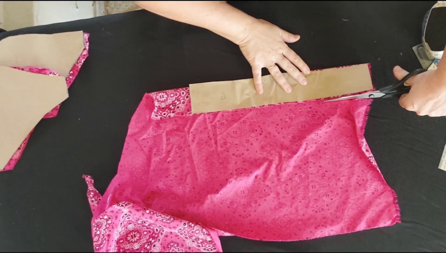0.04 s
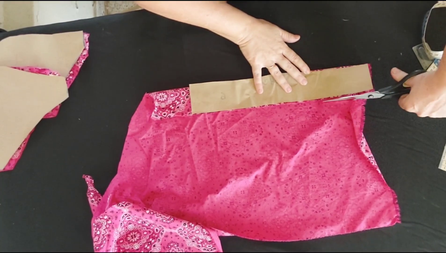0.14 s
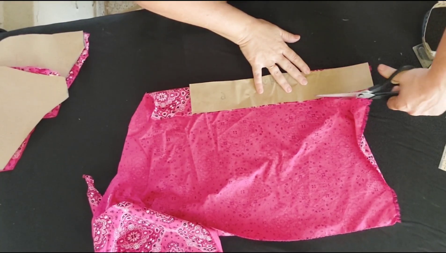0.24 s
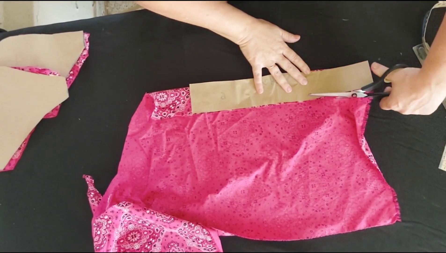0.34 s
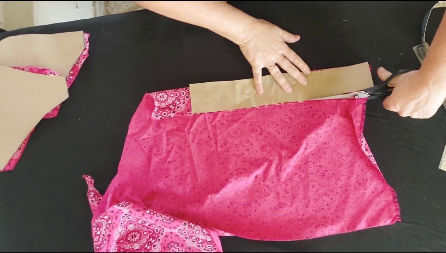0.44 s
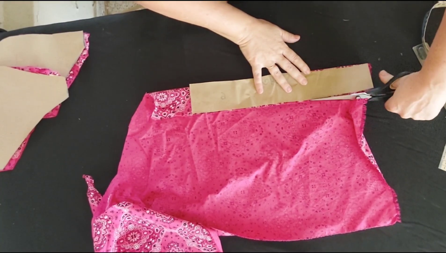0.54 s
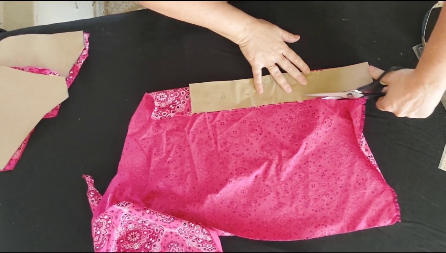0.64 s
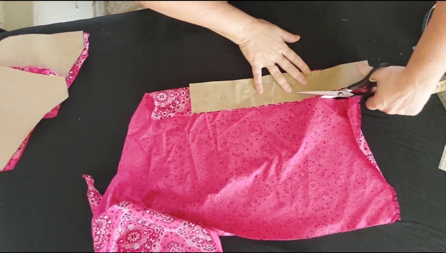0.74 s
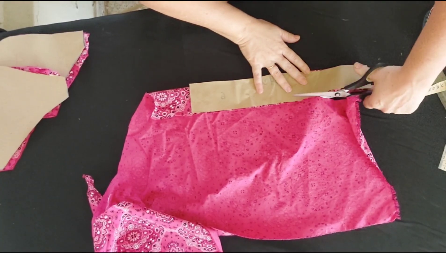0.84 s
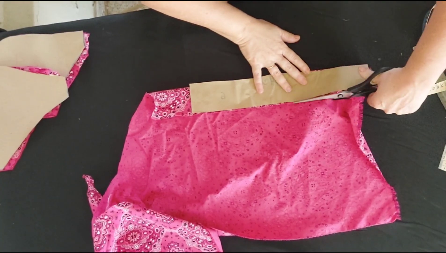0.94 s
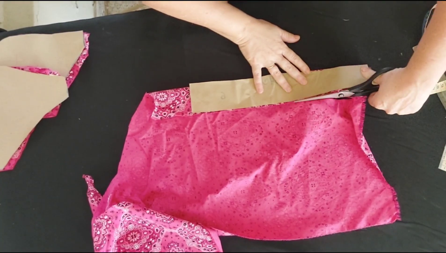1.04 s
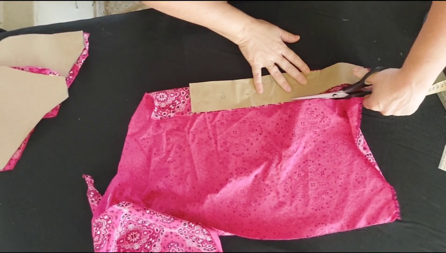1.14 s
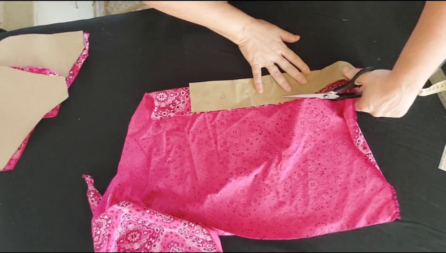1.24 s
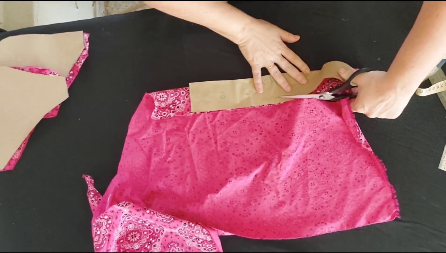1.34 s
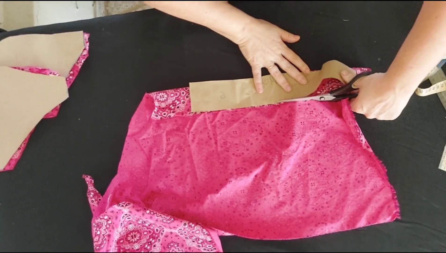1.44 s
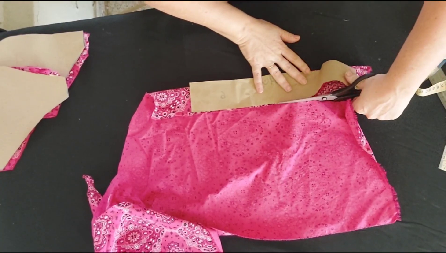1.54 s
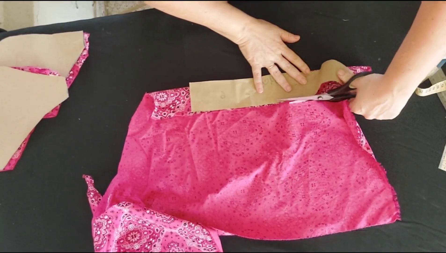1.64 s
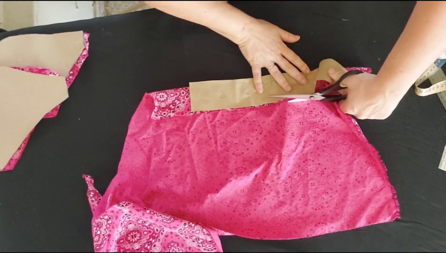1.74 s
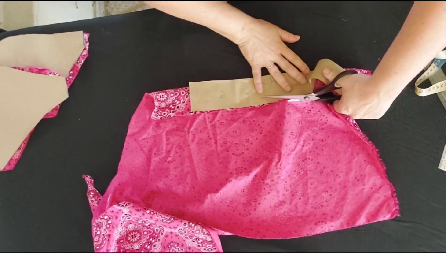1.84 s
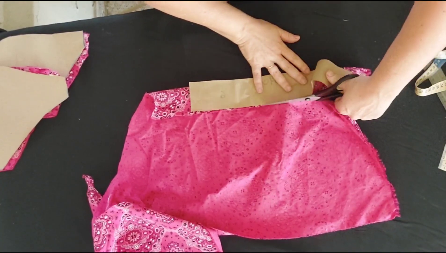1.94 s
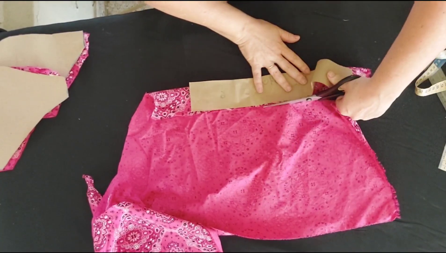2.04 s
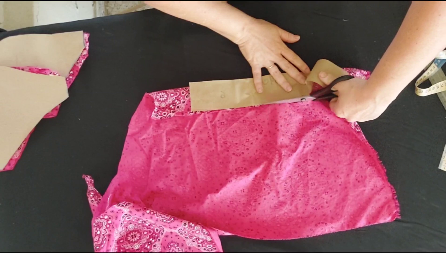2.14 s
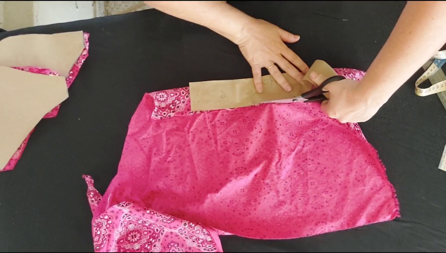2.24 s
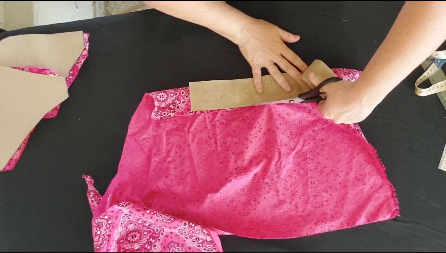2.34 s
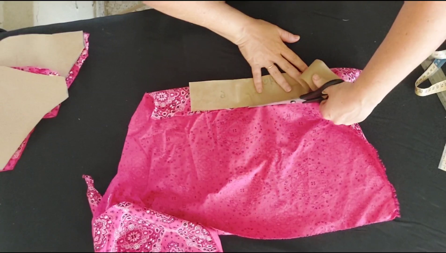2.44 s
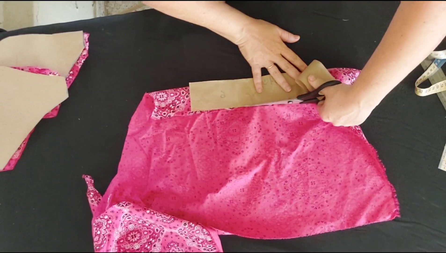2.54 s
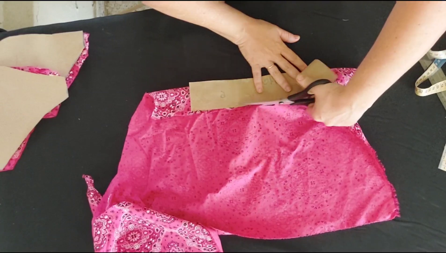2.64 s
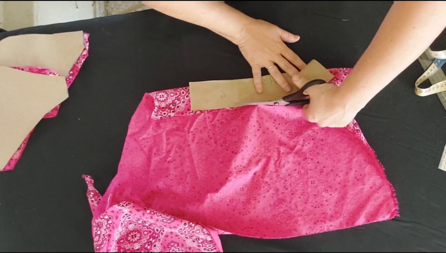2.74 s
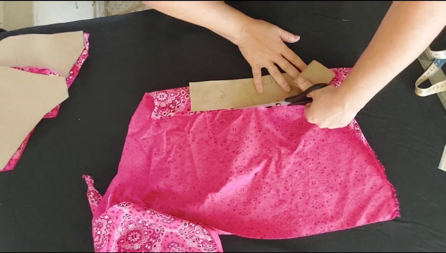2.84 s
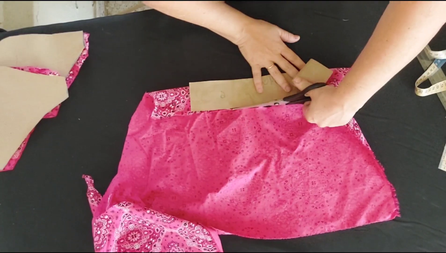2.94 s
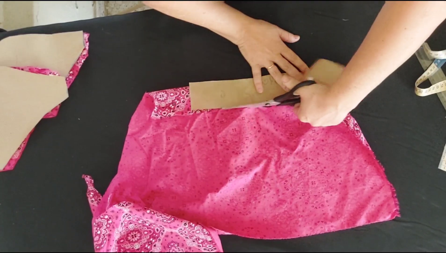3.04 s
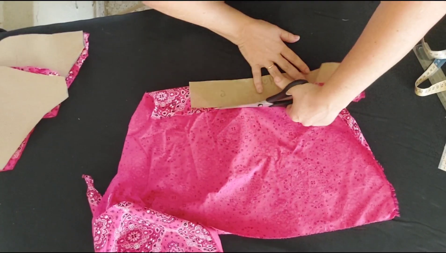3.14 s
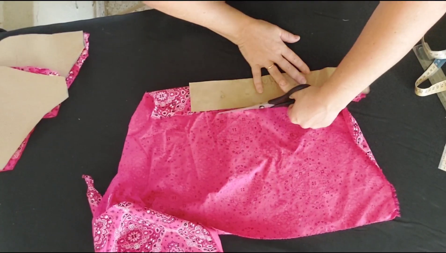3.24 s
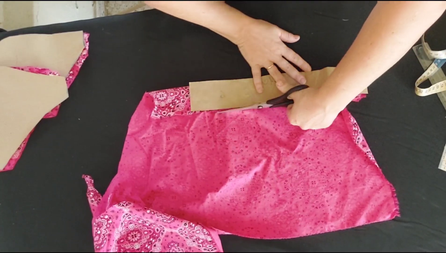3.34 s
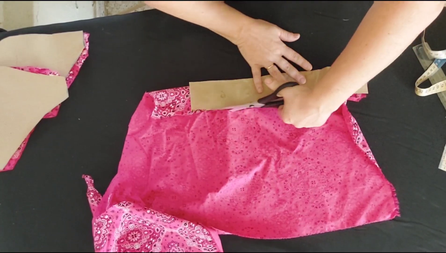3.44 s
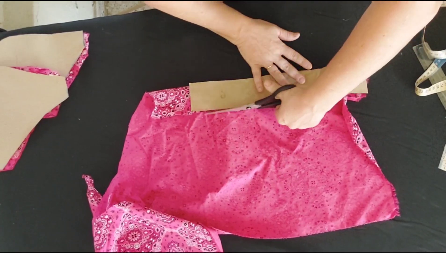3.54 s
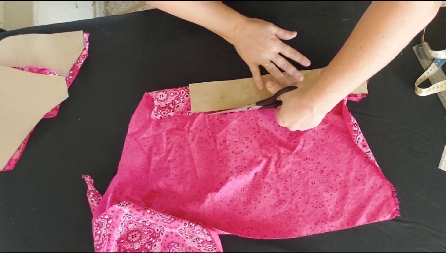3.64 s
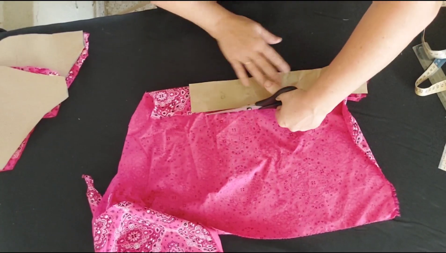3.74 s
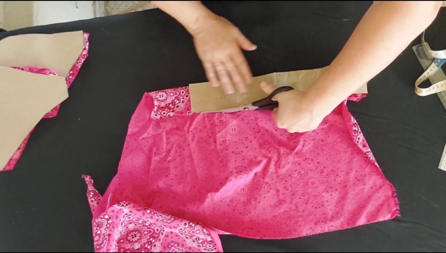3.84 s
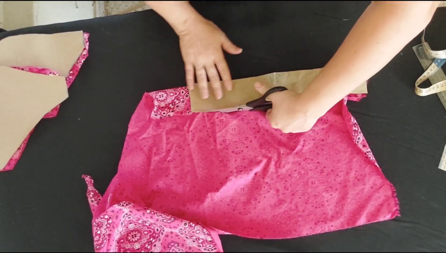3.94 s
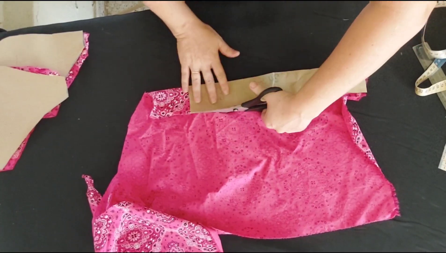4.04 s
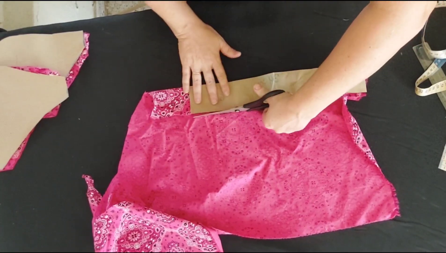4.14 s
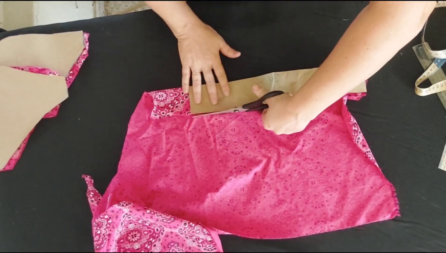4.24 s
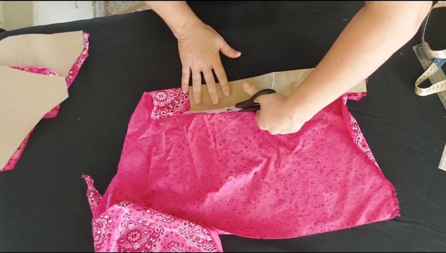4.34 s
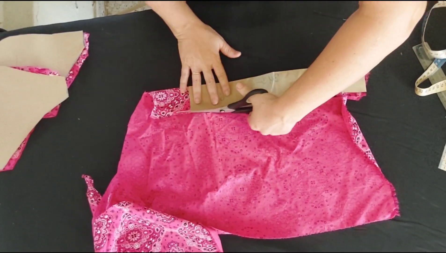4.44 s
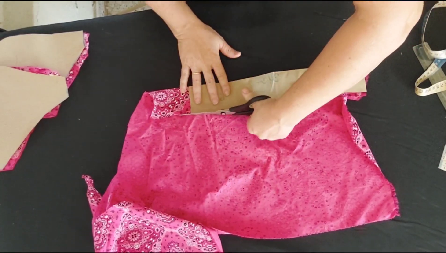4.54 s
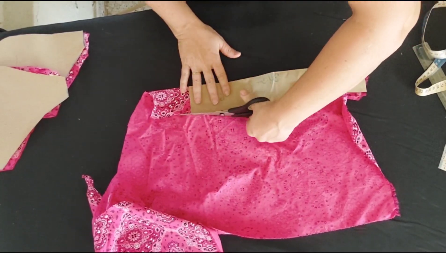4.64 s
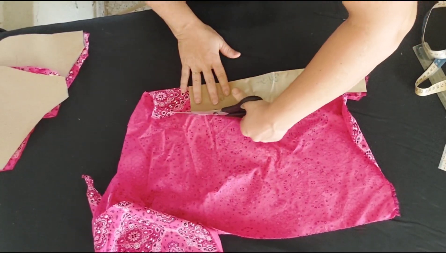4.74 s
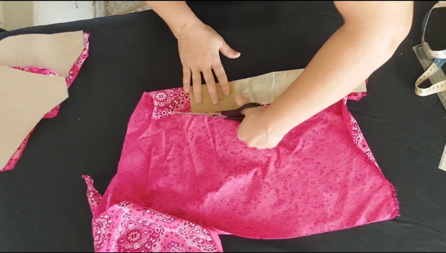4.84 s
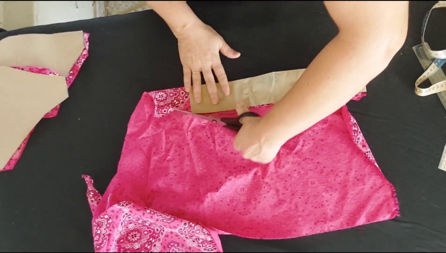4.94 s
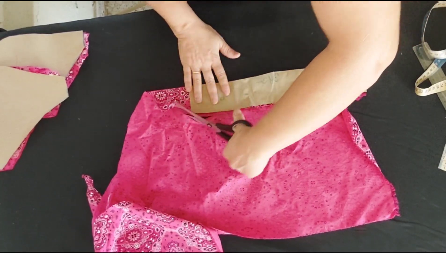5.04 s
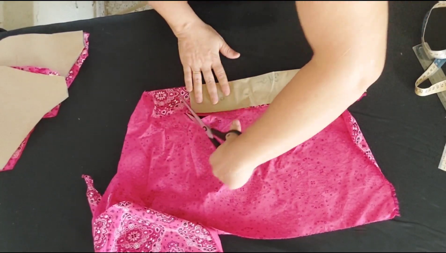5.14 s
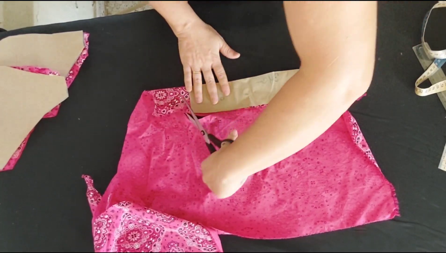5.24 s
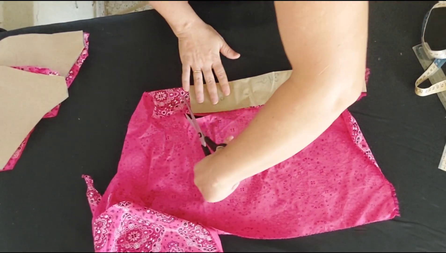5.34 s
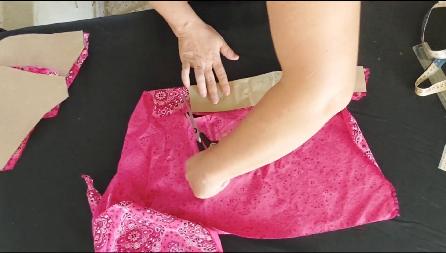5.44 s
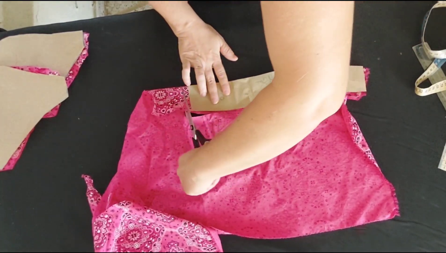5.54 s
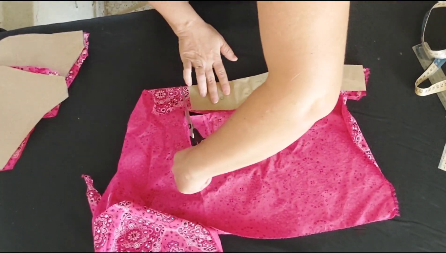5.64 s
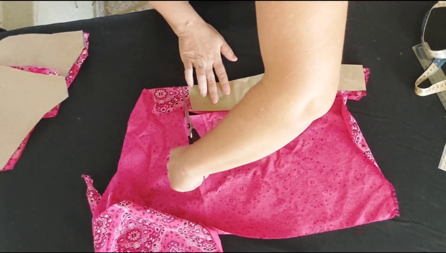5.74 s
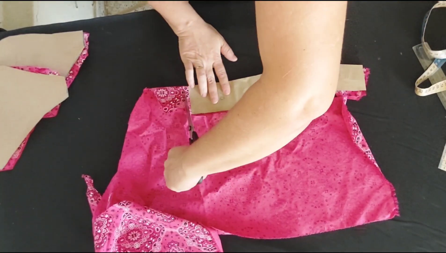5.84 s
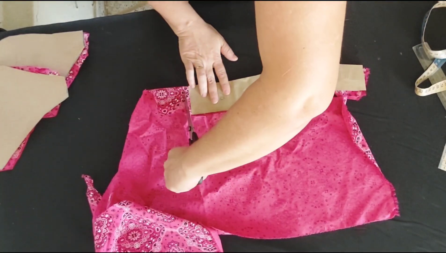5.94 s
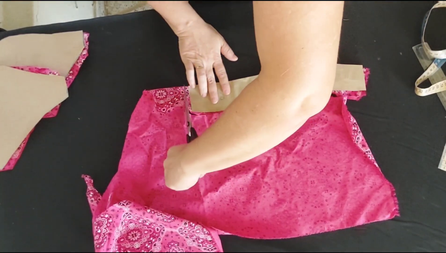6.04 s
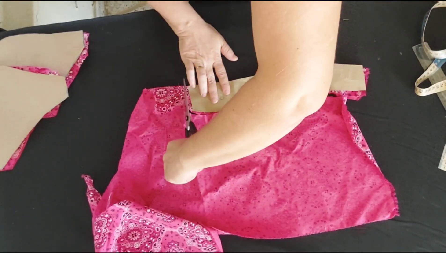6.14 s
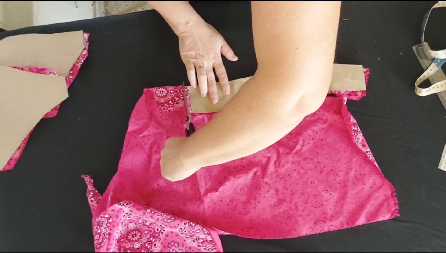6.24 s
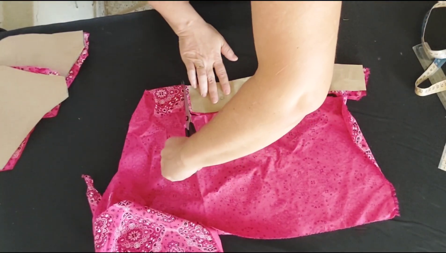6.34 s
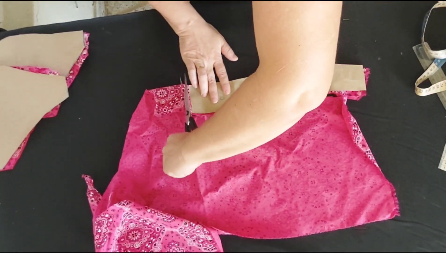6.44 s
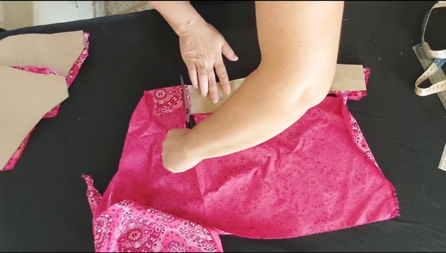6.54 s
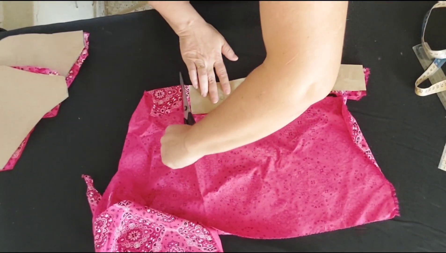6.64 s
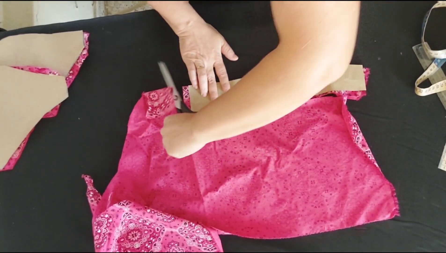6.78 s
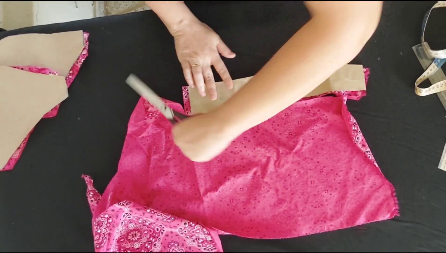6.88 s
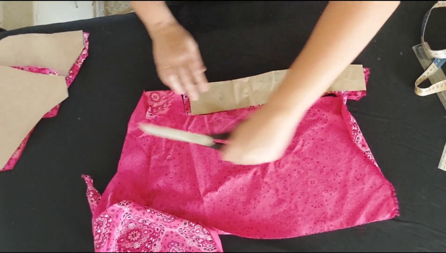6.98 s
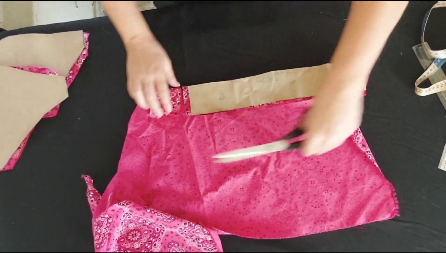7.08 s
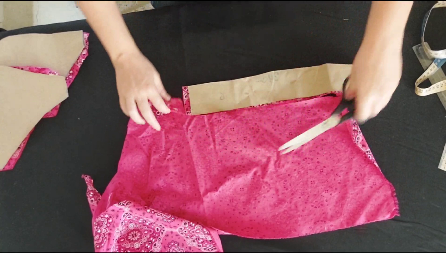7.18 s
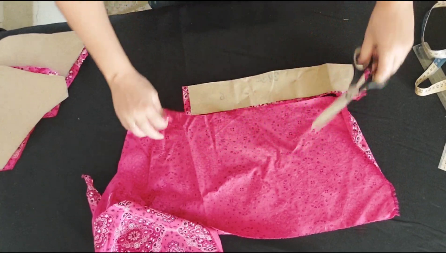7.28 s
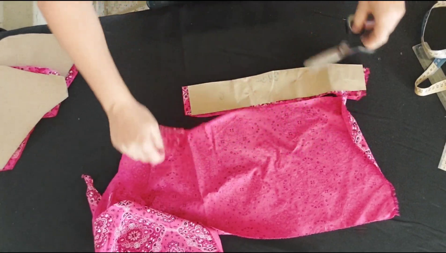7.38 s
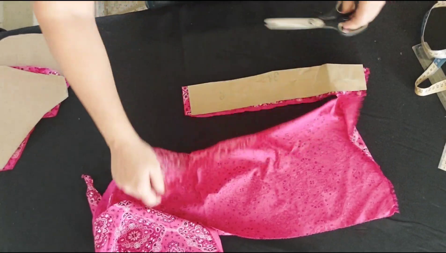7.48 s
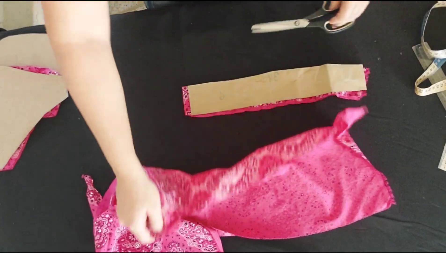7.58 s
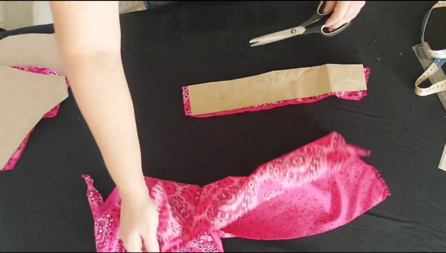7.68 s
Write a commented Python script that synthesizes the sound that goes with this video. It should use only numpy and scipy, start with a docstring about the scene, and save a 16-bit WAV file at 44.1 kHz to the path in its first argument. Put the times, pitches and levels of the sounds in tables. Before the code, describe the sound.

Close scissor strokes slice fabric with crisp thread snaps and dull table knocks, blades rasping open between cuts in a small quiet room.

```python
"""Tailor's shears cut cotton along a paper pattern on a table in a small room, one microphone above the table.
Each stroke is random grains under a swell of blade pressure, filtered as edges, threads, cloth and table top.
Between strokes, filtered noise makes pivot clicks, paper snaps and bumps; grains make reopenings and rustles.
Behind them lie room noise, a faint hiss, a thin electrical whine and a distant bird of gliding sine chirps.
Most sounds carry a diffuse room tail; event levels in the tables are settings before each layer's trim."""
import sys
import numpy as np
from scipy import signal
from scipy.fft import rfft, irfft, next_fast_len
from scipy.io import wavfile
from scipy.ndimage import map_coordinates

SR = 44100
rng = np.random.default_rng(int(sys.argv[2]) if len(sys.argv) > 2 else 0)


def store_pcm(level_fs):
    """Save levels as 16-bit WAV."""
    pcm = np.round(np.clip(level_fs, -1, 1) * 32767).astype(np.int16)
    wavfile.write(sys.argv[1], SR, np.atleast_2d(pcm).T)


N = 340011  # length in samples, about 7.7 s
T = np.arange(SR // 2) / SR  # time within one event (s)


# Cuts of the shears through the cloth; the last row is a soft rub as the shears are lifted away.
# Threads, cloth crunch and three table layers, then the hand's timing:
# start_s, snap_db, crunch_db, knock_db, rasp_db, boom_db, lead_in_s, bite_s, reopening_s
SHEAR_STROKES = [(0.0034, -40.5, -58, -39, -41, -30, 0.035, 0.024, 0.16),
                 (0.401, -35, -57.5, -39, -40, -30, 0.048, .037, 0.16),
                 (0.8864, -37, -64.5, -44.5, -47, -42, 0.091, 0.031, 0.35),
                 (1.4058, -38, -79, -58, -61, -54.5, 0.053, 0.043, 0.19),
                 (1.897, -38.5, -73, -66, -57.5, -46.5, 0.048, 0.044, 0.18),
                 (2.3281, -37, -65, -49, -51, -40.5, 0.054, .029, 0.27),
                 (2.757, -36, -62, -48.5, -45.5, -38.5, 0.051, 0.028, 0.15),
                 (3.158, -34, -51, -48, -41.5, -37, 0.037, 0.021, 0.19),
                 (3.5051, -34, -49.5, -39.5, -37.5, -38, .033, 0.025, 0.88),
                 (4.075, -35.5, -47.5, -39.5, -38.5, -37.5, 0.033, .016, 0.25),
                 (4.463, -33.5, -52.5, -38.5, -31.5, -28, 0.037, .031, 0.15),
                 (4.7414, -33.5, -57.5, -37, -31.5, -26, 0.023, .028, 0.199),
                 (5.7666, -31, -53, -42, -40.5, -36, 0.084, 0.032, .23),
                 (6.17, -34, -54.5, -37.5, -36.5, -32, 0.041, .034, 0.086),
                 (6.477, -35.5, -57.5, -35, -37.5, -31, 0.018, .029, 0.1),
                 (7.0808, -43, -73.5, -52.5, -58, -68, 0.067, 0.025, 1)]
# Spectrum of parting threads: pitch_hz, level_db
THREAD_SPECTRUM = [(2000, -22), (5000, -18), (8800, -25), (10500, -13.5), (12000, -7.5), (13300, -5.5),
                   (15000, -10), (16000, -19)]
# Spectrum of crunching cloth: pitch_hz, level_db
CRUNCH_SPECTRUM = [(500, -25.5), (1000, -5), (1350, -5), (1750, 3), (2350, -4), (2800, -6.5), (3800, -23),
                   (5000, -33), (10000, -33)]
# Spectrum of paper being bitten or moved: pitch_hz, level_db
PAPER_SPECTRUM = [(300, 3.5), (900, -3), (1400, -1.5), (2400, 2), (3500, -5.5), (5000, -6.5), (9000, -22.5),
                  (16000, -49)]
# Spectra of the force on the table, as knock, rasp and low boom: pitch_hz, level_db
KNOCK_SPECTRUM = [(300, -23.5), (550, 2.5), (750, 3.5), (900, 4.5), (1120, -2), (1500, -10.5),
                  (4000, -44.5)]
RASP_SPECTRUM = [(100, -44.5), (200, -3), (320, 3), (460, 5.5), (600, -6), (800, -3), (1200, -27),
                 (4000, -76)]
BOOM_SPECTRUM = [(30, -8.5), (60, -3), (130, -1.5), (220, -0.5), (320, -10.5), (600, -25), (1500, -69)]
# Resonances of the table top: pitch_hz, width_hz, level_db
TABLE_MODES = [(91.6, 24, -6), (125.6, 7.5, 5.5), (147.6, 11.7, 2), (219.8, 55.6, -7), (258.3, 42, -2.5),
               (305.8, 28, -1.5), (382.4, 20.6, -2), (432, 31, -3.5), (465.5, 33, -1.5), (553.7, 59, 3),
               (642, 101, -0.5), (747, 37, -1), (806, 15.3, -1.5), (875, 26, -6.5), (1148, 113, -12)]
TURN_S = 5.2  # cuts after this run across the strip
TURNED_EDGE_DB, TURNED_PAPER_DB = -3.5, 1  # then the edges hiss less and bite paper too (against the crunch)
EDGE_DB = -26  # edge hiss against the snap_db column
TABLE_EARLY_S = 0.0092  # table layers start early, since their filters speak about 10 ms late
SHUT_AFTER_S, SHUT_DB = 0.01397, -43.5  # a soft thud just after every bite; in a cut, the handles meet


def strokes():
    """Edges slide first, then threads part in clumps and the resting blade passes each snap into the table."""
    out = np.zeros(N)
    early = 0.12  # room before the bite for the lead-in (s)
    t = T - early
    for start, snap_db, crunch_db, knock_db, rasp_db, boom_db, lead, bite, _ in SHEAR_STROKES:
        turned = start > TURN_S

        # a shared uneven catch makes fine fibres and thicker yarns part in clumps
        catch = amp(3.5 * wobble(len(T), rate=200))
        fibres = catch * grains(len(T), rate=5000, spread_db=4.5)
        yarns = catch * grains(len(T), rate=1100, spread_db=3.5)

        snap_force = squeeze(t, lead, bite, swell_db=19, release=0.13)
        snap = amp(snap_db - 16) * burst(fibres, snap_force, THREAD_SPECTRUM)
        slide = amp(snap_db + EDGE_DB + turned * TURNED_EDGE_DB) * edge_hiss(t, lead, bite)

        # the crunch envelope runs 2 ms behind that of the snaps
        shearing = squeeze(t - 0.002, lead, bite, swell_db=16, release=0.11)
        cloth = burst(yarns + 0.5 * fibres, shearing, CRUNCH_SPECTRUM)
        paper = turned * amp(TURNED_PAPER_DB) * burst(fibres, shearing, PAPER_SPECTRUM)
        crunch = amp(crunch_db) * (cloth + paper)

        press = squeeze(t + TABLE_EARLY_S, lead, bite, swell_db=15, release=0.12)
        knock = amp(knock_db) * burst(yarns, press, KNOCK_SPECTRUM, TABLE_MODES)
        rasp = amp(rasp_db + 1) * burst(yarns, press, RASP_SPECTRUM, TABLE_MODES)
        boom = amp(boom_db - 1.5) * burst(yarns, press, BOOM_SPECTRUM, TABLE_MODES)

        shear = room(snap + slide + crunch, wet_db=-7)
        table = room(knock + rasp, wet_db=-8) + room(boom, wet_db=-7.5)
        add(out, start - early, shear + table)
        add(out, start + bite + SHUT_AFTER_S, thud(SHUT_DB))
    return out


def squeeze(t, lead, bite, swell_db, release):
    """Blade pressure: it builds over the lead-in, holds through the bite and lets go (60 dB per release)."""
    touch = np.clip((t + lead) / 0.01, 0, 1)
    build_db = swell_db * np.clip(t / lead, -1, 0)
    let_go_db = -60 * np.maximum(t - bite, 0) / release
    return touch * amp(build_db + let_go_db)


EDGE_START_HZ, EDGE_END_HZ = 5500, 7240  # hiss band with the edges' crossing point at the pivot, at the tip


def edge_hiss(t, lead, bite):
    """Steel slides on steel; a crossfade of two narrow bands lifts the hiss through the stroke."""
    travel = np.clip((t + lead) / (lead + bite), 0, 1)
    pressure = squeeze(t, lead, bite, swell_db=4.5, release=0.017)
    hiss = np.zeros(len(T))
    for hz, share in ((EDGE_START_HZ, 1 - travel), (EDGE_END_HZ, travel)):
        slips = grains(len(T), rate=5300, spread_db=0.5)
        hiss += burst(slips, pressure * np.sqrt(share), hump(hz, below_db=36, above_db=30))
    return hiss


REOPEN_AFTER_S, REOPEN_TYPICAL_S = 0.09, 0.2  # pause after a bite; length of an ordinary reopening
# settings of an ordinary reopening, before the trims in friction()
REOPEN_HISS_DB, REOPEN_PAPER_DB, REOPEN_DRAG_DB, REOPEN_RUMBLE_DB = -68.5, -71, -64, -54.5
HISS_SPEED_DB, PAPER_SPEED_DB, TABLE_SPEED_DB = 4.5, 3.5, 9  # gain for each doubling of the speed


def reopenings():
    """After each cut the blades open and nose forward: the quicker, the louder."""
    out = np.zeros(N)
    for start, *_, bite, length in SHEAR_STROKES[:-1]:  # not after the closing soft rub
        speed = np.log2(REOPEN_TYPICAL_S / length)  # doublings of the ordinary speed
        hiss_db = REOPEN_HISS_DB + HISS_SPEED_DB * speed
        paper_db = REOPEN_PAPER_DB + PAPER_SPEED_DB * speed
        drag_db = REOPEN_DRAG_DB + TABLE_SPEED_DB * speed
        rumble_db = REOPEN_RUMBLE_DB + TABLE_SPEED_DB * speed
        add(out, start + bite + REOPEN_AFTER_S, friction(length, hiss_db, paper_db, drag_db, rumble_db))
    return out


# Spectrum of rubbed cloth, also used for the background hiss: pitch_hz, level_db
CLOTH_SPECTRUM = [(2000, -44), (3800, -11), (5000, -1), (7200, 4), (8800, -2.5), (11000, 3), (12800, 5),
                  (15000, 6), (16000, -17)]


def friction(length, hiss_db, paper_db, drag_db, rumble_db):
    """One swell of fine friction: cloth hisses, paper rustles and the table murmurs below."""
    swell = np.sqrt(np.abs(np.sin(np.pi * np.clip(T / length, 0, 1))))
    unevenness = amp(2 * wobble(len(T), rate=60))
    force = unit(unevenness * grains(len(T), rate=5000, spread_db=3.5))
    cloth = amp(hiss_db - 2) * burst(force, swell, CLOTH_SPECTRUM)
    paper = amp(paper_db - 7) * burst(force, swell, PAPER_SPECTRUM)
    drag_spectrum = hump(366, below_db=3, above_db=8)
    drag = amp(drag_db) * burst(force, swell, drag_spectrum, TABLE_MODES)
    rumble = amp(rumble_db - 2) * burst(force, swell, BOOM_SPECTRUM, TABLE_MODES)
    return room(cloth + paper + drag, wet_db=-6) + rumble


# Clicks of the pivot and blades, each with a hollow clack: start_s, click_db, clack_db
STEEL_CLICKS = [(0.7012, -50, -52.5), (1.2318, -30, -41), (1.5534, -47, -67), (1.606, -49.5, -50),
                (2.5108, -54, -53.5), (5.2827, -55.5, -72)]
# Spectrum of the steel blades: pitch_hz, level_db
STEEL_SPECTRUM = [(400, -18), (1250, -11), (1800, -15), (2450, -10), (3300, -15), (4100, -11), (4430, -3),
                  (4750, -9), (5400, 2), (6150, -5), (7100, -3), (7900, -17), (12000, -21), (16000, -28)]


def clicks():
    """The blades catch on each other; the hand damps their ring at once."""
    out = np.zeros(N)
    fade = (1 - np.exp(-T / 0.0015)) * amp(-60 * T / 0.018)
    for start, click_db, clack_db in STEEL_CLICKS:
        ring = amp(click_db + 4) * burst(rng.standard_normal(len(T)), fade, STEEL_SPECTRUM)
        clack = amp(clack_db + 7) * burst(rng.standard_normal(len(T)), fade, PAPER_SPECTRUM)
        add(out, start - 0.001, room(ring, wet_db=-9) + room(clack, wet_db=-2))
    return out


# Single snaps of paper and taut cloth: start_s, crack_db, body_db
LONE_SNAPS = [(2.3703, -35.5, -48.5), (2.7792, -50, -43.5), (2.9707, -39, -69), (3.077, -36, -35),
              (3.1956, -37, -39.5), (5.695, -51, -45.5), (5.722, -28, -38), (5.7522, -34, -32.5),
              (5.7716, -41, -32.5), (6.1969, -42, -42), (6.458, -41, -68), (6.4872, -34, -37.5),
              (6.6703, -42.5, -50), (7.0142, -41, -55.5)]


def snaps():
    """Paper and taut threads give way in a few milliseconds: a bright crack over a papery body."""
    out = np.zeros(N)
    fade = (1 - np.exp(-T / 0.0012)) * amp(-60 * T / 0.022)
    for start, crack_db, body_db in LONE_SNAPS:
        crack = amp(crack_db - 3.5) * burst(rng.standard_normal(len(T)), fade, THREAD_SPECTRUM)
        body = amp(body_db - 0.5) * burst(rng.standard_normal(len(T)), fade, PAPER_SPECTRUM)
        add(out, start, room(crack + body, wet_db=-6))
    return out


# The shears bump the table as they move on: start_s, thud_db, scuff_db
TABLE_BUMPS = [(0.18, -44, -56), (0.563, -37, -52), (1.602, -43.5, -70), (2.371, -32, -53.5),
               (3.201, -28.5, -43), (3.305, -36, -49), (3.687, -44, -51), (4.227, -40, -44),
               (4.605, -32, -45), (4.932, -37.5, -65), (6.532, -28, -48), (6.663, -36, -67)]
SCUFF_T60_S = 0.14


def bumps():
    """The shears land on the table with a thud and scuff a little way."""
    out = np.zeros(N)
    fade = amp(-60 * T / SCUFF_T60_S)
    scuff_spectrum = hump(314, below_db=9.5, above_db=10.5)
    for start, thud_db, scuff_db in TABLE_BUMPS:
        scrape = burst(rng.standard_normal(len(T)), fade, scuff_spectrum, TABLE_MODES)
        scuff = amp(scuff_db) * scrape
        add(out, start, thud(thud_db) + room(scuff, wet_db=-8))
    return out


def thud(db):
    """A soft contact through the cloth sets the table's low modes ringing."""
    contact = amp(-60 * T / 0.052) * rng.standard_normal(len(T))
    ringing = colour(contact, BOOM_SPECTRUM, TABLE_MODES)
    return room(amp(db - 3.5) * ringing / np.abs(ringing).max(), wet_db=-4)


# Hands shift the work: start_s, length_s, cloth_db, paper_db
HAND_RUSTLES = [(0.684, 0.058, -62, -53.5), (1.64, .19, -64.5, -66.5), (2.474, 0.07, -57, -66),
                (2.94, 0.16, -55.5, -53), (3.074, 0.1, -78, -51), (3.85, 0.22, -76, -75),
                (5.323, 0.34, -69.5, -77.5), (6.581, 0.12, -73, -63.5), (6.749, 0.062, -65, -76),
                (7.009, 0.063, -64, -59)]
RUSTLE_DRAG_DB, RUSTLE_RUMBLE_DB = -79, -62.5  # the table under the hands, before the trims in friction()


def rustles():
    """The hands push cloth and paper pattern over the table."""
    out = np.zeros(N)
    for start, length, cloth_db, paper_db in HAND_RUSTLES:
        add(out, start, friction(length, cloth_db, paper_db, RUSTLE_DRAG_DB, RUSTLE_RUMBLE_DB))
    return out


# Chirps of a distant bird: start_s, length_s, start_pitch_hz, end_pitch_hz, level_db
BIRD_CHIRPS = [(4.195, 0.067, 5730, 5500, -65), (4.523, 0.021, 6800, 5160, -54),
               (4.607, .02, 4630, 4100, -69), (5.003, 0.045, 5140, 4150, -68.5),
               (5.076, .02, 6900, 5260, -61.5)]


def bird():
    """Thin wavering chirps from afar: gliding sines with more echo than direct sound."""
    out = np.zeros(N)
    for start, length, start_hz, end_hz, db in BIRD_CHIRPS:
        progress = np.clip(T / length, 0, 1)
        hz = start_hz + (end_hz - start_hz) * progress + 260 * wobble(len(T), rate=350)
        tone = np.sin(2 * np.pi * np.cumsum(hz) / SR)
        chirp = amp(db - 8) * np.sin(np.pi * progress) * tone
        add(out, start, room(chirp, wet_db=1.5))
    return out


def background():
    """Low room noise and a faint hiss, both filtered noise, and a thin electrical whine, a steady sine."""
    air_spectrum = [(20, -25.5), (60, 1), (105, -2.5), (200, -11), (500, -20.5), (1200, -32.5),
                    (4000, -42), (15000, -73)]  # pitch_hz, level_db
    air = unit(colour(rng.standard_normal(N), air_spectrum))
    hiss = unit(colour(rng.standard_normal(N), CLOTH_SPECTRUM))
    whine = np.sin(2 * np.pi * 12516 * np.arange(N) / SR)
    return amp(-61.5) * air + amp(-75) * hiss + amp(-91) * whine


# Decay of the small room: pitch_hz, t60_s
ROOM_DECAY = [(120, 0.44), (500, 0.37), (1500, 0.43), (4000, 0.43), (9000, 0.25), (15000, 0.14)]


def room(x, wet_db):
    """x with a diffuse tail 5 ms behind; the treble dies first."""
    hz, t, z = signal.stft(rng.standard_normal(SR // 2), SR, nperseg=256)
    decay = amp(-60 * t / along(ROOM_DECAY, hz)[:, None])
    tail = signal.istft(z * decay, SR, nperseg=256)[1]
    tail = np.pad(tail / np.linalg.norm(tail), (SR // 200, 0))
    return x + amp(wet_db) * signal.fftconvolve(x, tail)[:len(x)]


def grains(size, rate, spread_db):
    """Tiny slips and snaps at random moments, about rate a second, of uneven strength."""
    chance, strength = rng.random(size), rng.standard_normal(size)
    sign = rng.choice([-1, 1], size)
    return unit((chance < rate / SR) * sign * amp(spread_db * np.clip(strength, -2, 2)))


def burst(force, envelope, spectrum, body=None):
    """A shaped force sounding through a filter, with the energy of its envelope."""
    x = colour(force * envelope, spectrum, body)
    return unit(x) * np.sqrt(np.mean(envelope ** 2))


def colour(x, spectrum, body=None):
    """Causal (minimum-phase) filter with the given spectrum, then an optional resonant body."""
    m = 2 * next_fast_len(len(x) // 2 + SR // 8)
    hz = np.fft.rfftfreq(m, 1 / SR)
    cepstrum = irfft(np.log(amp(along(spectrum, hz))))
    response = np.exp(rfft(2 * cepstrum[:m // 2], m) - cepstrum[0])
    if body is not None:
        modes = 0
        for k, (f, width, db) in enumerate(body):
            damping = 1j * hz * width
            modes = modes + (-1) ** k * amp(db) * damping / (f * f - hz * hz + damping)  # signs alternate
        response = response * modes
    return irfft(rfft(x, m) * response, m)[:len(x)]


def hump(hz, below_db, above_db):
    """A broad spectral hill; slopes in dB an octave, half as steep again past an octave above."""
    return [(hz / 4, -2 * below_db), (hz / 2, -below_db), (hz, 0), (hz * 2, -above_db), (hz * 8, -4 * above_db)]


def wobble(size, rate):
    """A smooth random curve, rate knots a second."""
    knots = rng.standard_normal(size // 16)
    return map_coordinates(knots, [np.arange(size) * rate / SR], mode="mirror")


def along(points, hz):
    """(Hz, value) points read on a log frequency axis."""
    f, v = np.transpose(points)
    return np.interp(np.log(hz + 1), np.log(f), v)


def amp(db):
    """Decibels to gain."""
    return 10 ** (np.asarray(db) / 20)


def unit(x):
    """x scaled to rms 1."""
    return x / np.sqrt(np.mean(x ** 2) + 1e-20)


def add(track, s, x):
    """Mix x into the track from time s, cut off at the track's ends."""
    i = round(s * SR)
    part = x[max(-i, 0):N - i]
    track[max(i, 0):][:len(part)] += part


def scene():
    """Everything at one microphone above the table."""
    shears = strokes() + reopenings() + clicks()
    work = snaps() + bumps() + rustles()
    return (shears + work + bird() + background())[None]


TOP_HZ = 15850  # band limit of the recorder


def record(dry):
    """The recorder keeps nothing above its band limit."""
    m = next_fast_len(N + SR // 4)
    kept = np.fft.rfftfreq(m, 1 / SR) < TOP_HZ
    return irfft(rfft(dry, m) * kept, m)[:, :N]


dry = scene()
out = record(dry)
store_pcm(out)
```